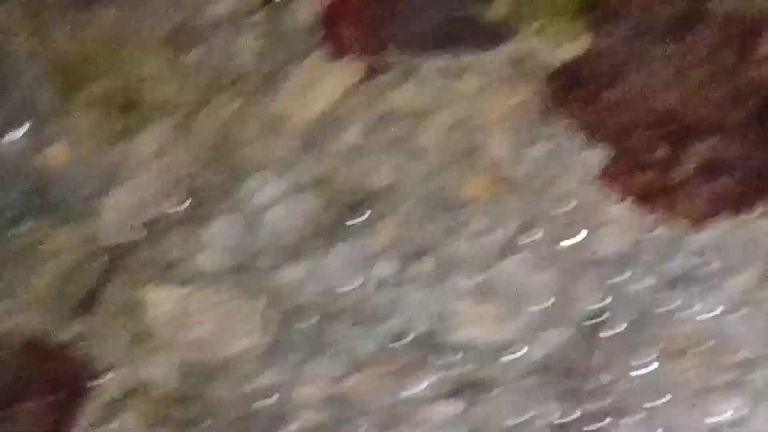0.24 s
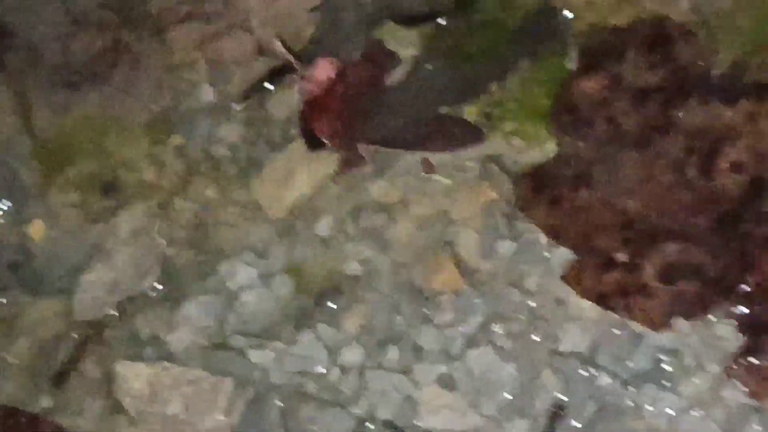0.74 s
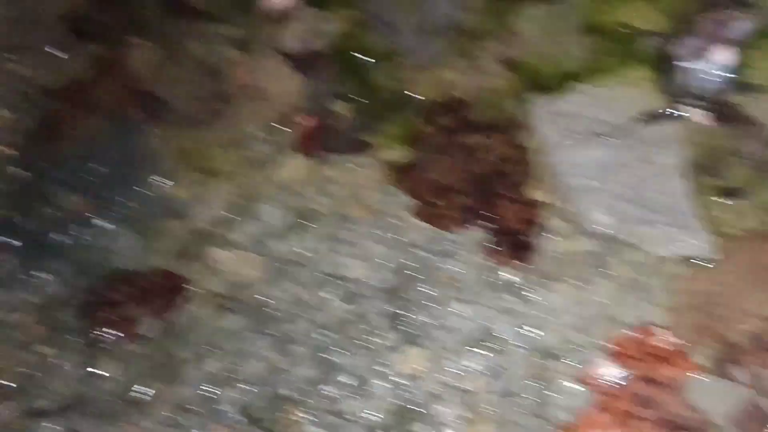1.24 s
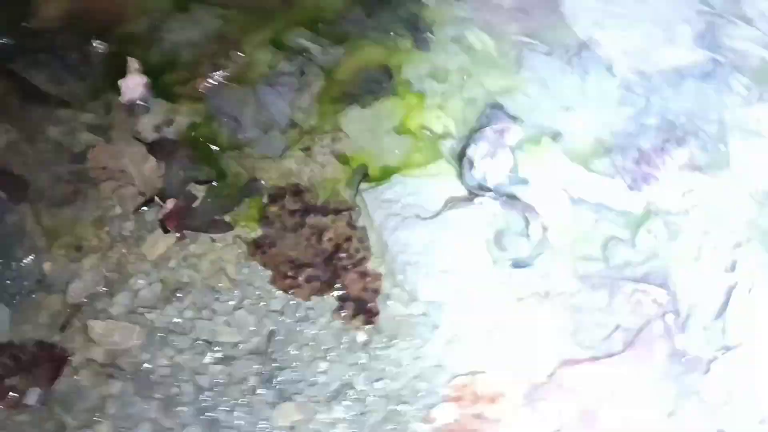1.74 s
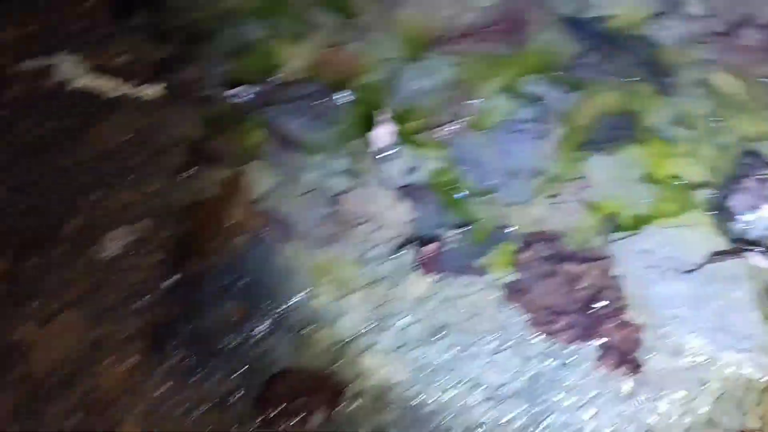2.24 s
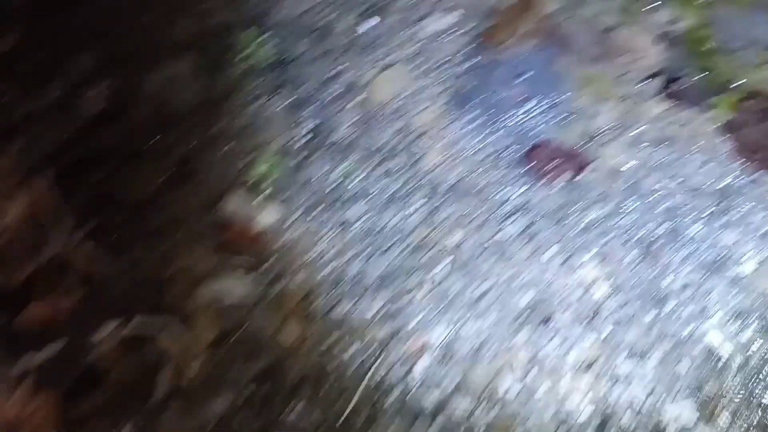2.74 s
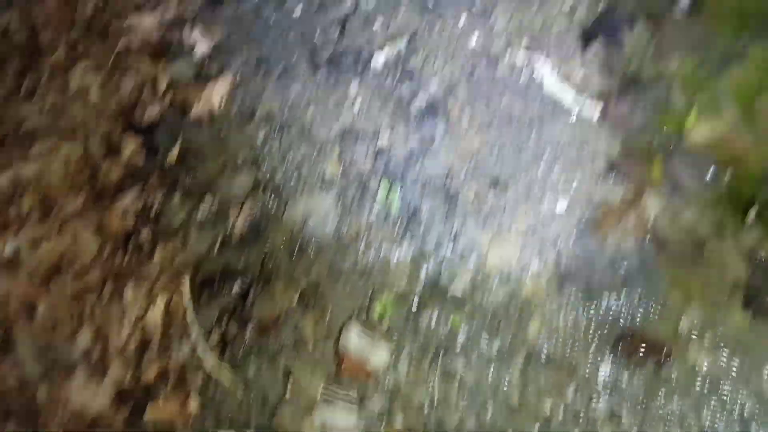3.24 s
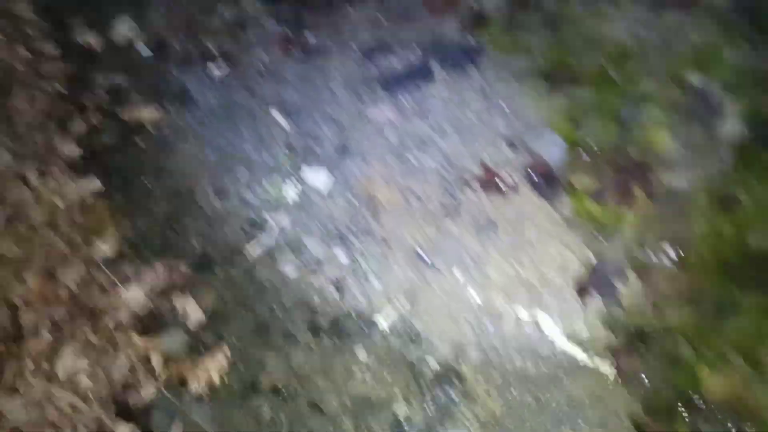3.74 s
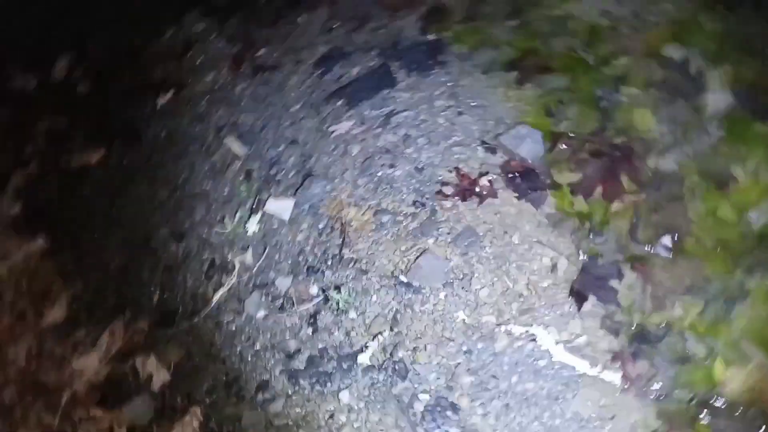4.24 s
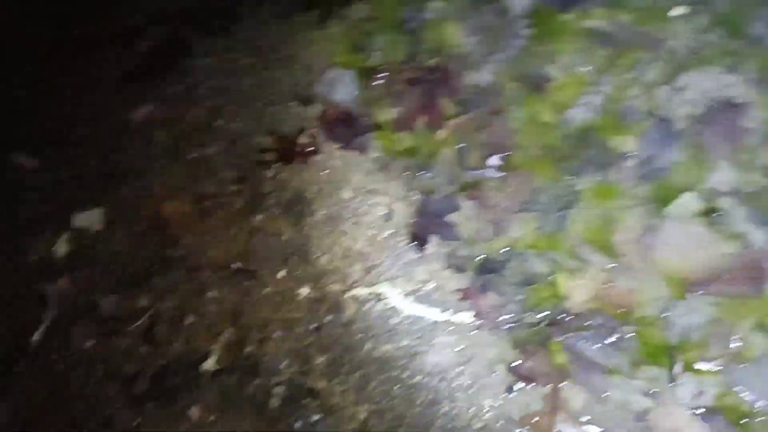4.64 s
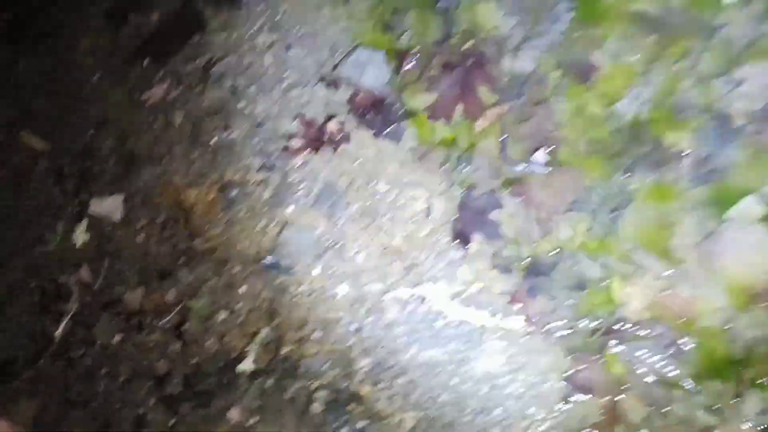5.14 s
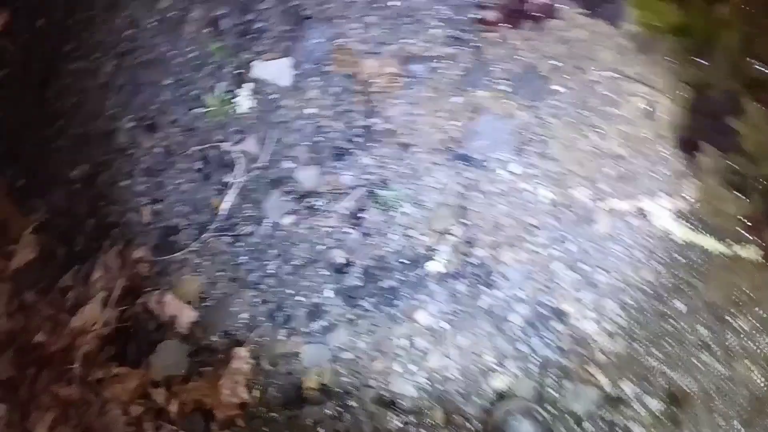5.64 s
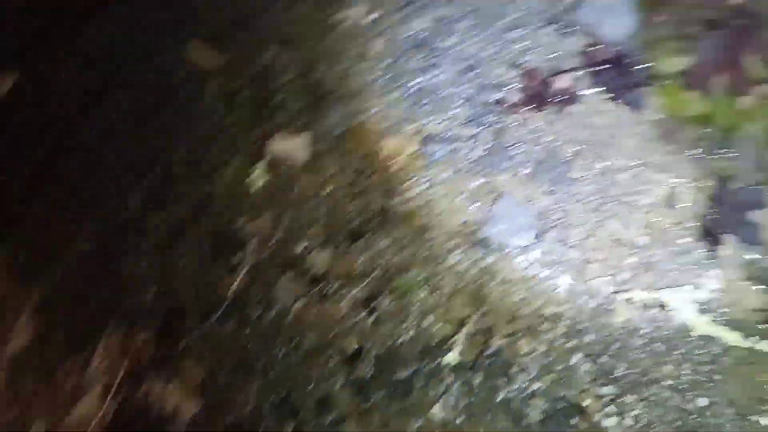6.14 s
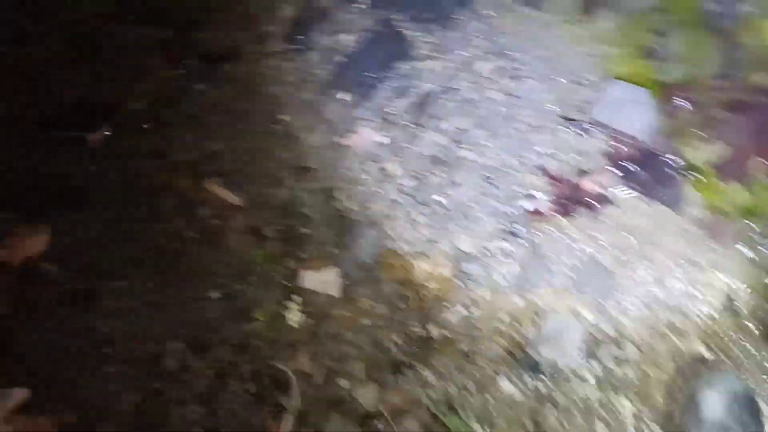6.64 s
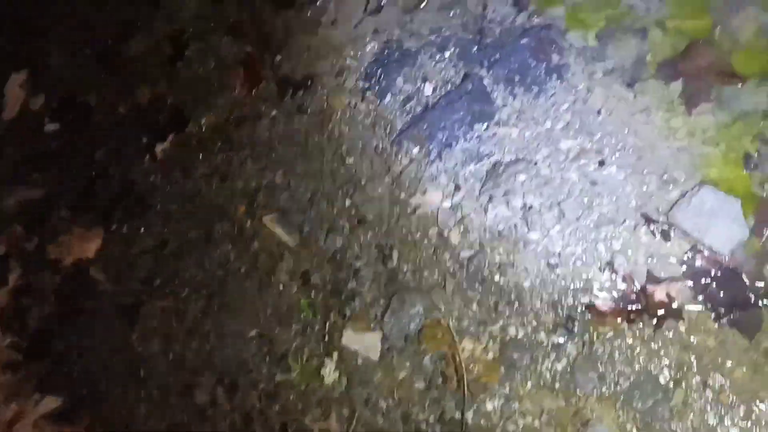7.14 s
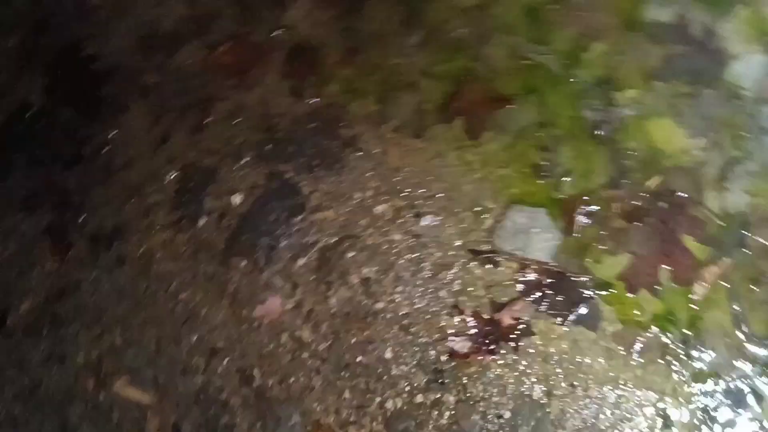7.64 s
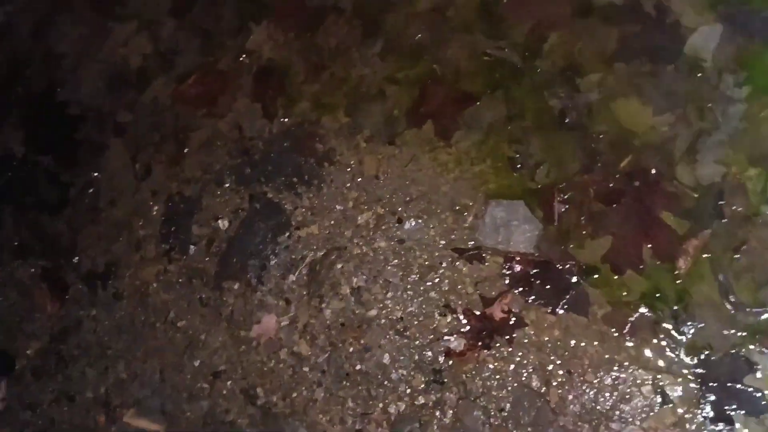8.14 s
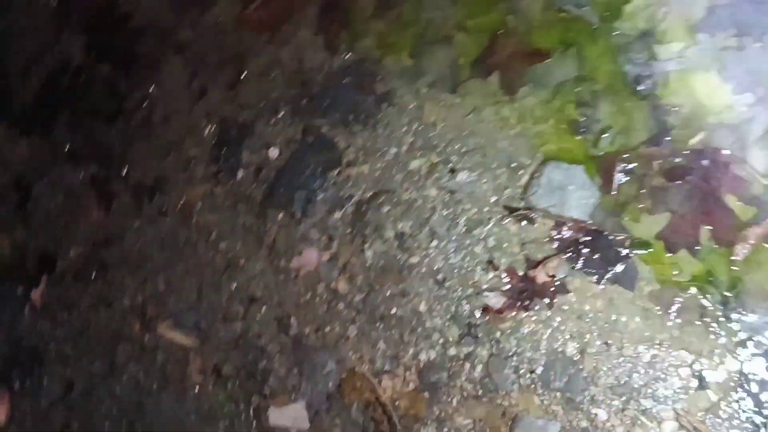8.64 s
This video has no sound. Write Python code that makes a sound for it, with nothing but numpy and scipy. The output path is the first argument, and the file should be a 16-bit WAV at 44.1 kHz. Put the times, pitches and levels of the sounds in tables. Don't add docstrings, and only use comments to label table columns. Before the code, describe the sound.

At night by a wet seep in the woods, many small frogs call close by, short rising rasps overlapping, mostly left, over a faint distant chorus. A handheld stereo microphone picks up bright ticks, dull knocks and brief skin scuffs. Road noise swells on the right after five seconds, strongest around eight, as a larger frog begins a slow trill on the left.

```python
import sys
import numpy as np
from scipy import signal
from scipy.fft import rfft, irfft, next_fast_len
from scipy.io import wavfile
from scipy.ndimage import uniform_filter1d, map_coordinates

SR = 44100
rng = np.random.default_rng(int(sys.argv[2]) if len(sys.argv) > 2 else 0)


def gain_from_db(level_db):
    decades = np.asarray(level_db, float) / 20
    return 10 ** decades


def unload_audio(sound):
    columns = np.transpose(np.atleast_2d(sound))
    steps = np.round(np.clip(columns, -1, 1) * 32767)
    wavfile.write(sys.argv[1], SR, steps.astype(np.int16))


N = 391616
FROG_LAG_MS = 0.65


def in_time(rows, t):
    s, *columns = np.transpose(rows)
    return [np.interp(t, s, c) for c in columns]


def rms_one(x):
    return x / np.sqrt(np.mean(x ** 2) + 1e-20)


def coloured(x, spectrum):
    size = next_fast_len(N)
    hz, level_db = np.transpose(spectrum)
    bins_hz = np.arange(size // 2 + 1) * SR / size
    gain = gain_from_db(np.interp(np.log(bins_hz + 1), np.log(hz), level_db))
    return irfft(rfft(x, size) * gain, size)[..., :N]


def filtered(x, order, hz, kind="low"):
    return signal.sosfilt(signal.butter(order, hz, kind, fs=SR, output="sos"), x)


def drift(rate, size=N):
    knots = rng.standard_normal(int(size / SR * rate) + 3)
    coarse = np.arange(0, size + 16, 16)
    return np.interp(np.arange(size), coarse, map_coordinates(knots, [coarse / SR * rate], order=3))


def add(out, sound, start_s, lag_ms):
    starts = [round((start_s + lag_ms / 1000) * SR), round(start_s * SR)]
    for port, at in enumerate(starts):
        part = sound[port][:max(N - at, 0)]
        out[port, at:at + len(part)] += part


# pitch_hz, level_db
AIR_SPECTRUM = [(30, -17), (75, -1), (125, -13.5), (190, -35), (900, -26.5), (3000, -28.5), (6400, -25.5),
                (8200, -45), (15000, -58.5)]


def air():
    common = rng.standard_normal(N)
    own = 0.8 * rng.standard_normal((2, N))
    both = rms_one(coloured(common + own, AIR_SPECTRUM))
    rumble = filtered(both, 2, 130)
    lumps = gain_from_db(3.5 * drift(15)) - 1
    return (both + rumble * lumps) * gain_from_db(-52.5 + np.array([[2.5], [-5]]))


# time_s, tyre_roar_db
ROAD_NEARNESS = [(0, -66.5), (1.9, -64.5), (2.6, -62.5), (4.5, -58.5), (5.5, -53), (6.1, -55.5), (6.5, -51),
                 (7.2, -49.5), (7.5, -43), (7.95, -43), (8.3, -42.5), (8.5, -46), (8.88, -47)]
# pitch_hz, level_db (per Hz)
ROAR_SPECTRUM = [(50, -21.5), (100, -11.5), (230, -2.5), (400, -5.5), (680, 1), (1100, -1.5), (1310, 0.5),
                 (1550, 3.5), (3000, -11), (6300, -16), (7500, -27.5), (12000, -79)]


def road():
    t = np.arange(N) / SR
    roar_db, = in_time(ROAD_NEARNESS, t)
    swing_db = roar_db + 34.5
    hiss_db = 9.5 * np.exp(-((t - 7.89) / 0.21) ** 4)
    drone_db = 6 * np.exp(-((t - 7.92) / 0.41) ** 4)
    near = 0.5 + 0.5 * np.tanh((t - 7.58) / 0.068)
    direct = rng.standard_normal(N)
    scattered = 0.45 * rng.standard_normal((2, N))
    lag = round(1.399 * SR / 1000)
    both = np.array([np.roll(direct, lag), direct]) + scattered
    wide = rms_one(coloured(both, ROAR_SPECTRUM))

    roar = 0
    edges_hz = [60, 170, 350, 500, 900, 1300, 2000, 3500, 14000]
    for low, high in zip(edges_hz, edges_hz[1:]):
        follows = -0.0032 * (high <= 350) + 0.13 * (low >= 3500) + 0.3 * (500 <= low < 2000)
        band_db = roar_db + 14 + follows * swing_db
        band_db = band_db + hiss_db * (low >= 3500) + drone_db * (low == 500)
        band_db = band_db + near * (5.5 * (low == 1300) - 16 * (low == 900))
        band_db = band_db + 1.1 * drift(8) + 1.5 * drift(60)
        roar = -roar + filtered(wide, 2, [low, high], "band") * gain_from_db(band_db)

    whine_hz, whine_width_hz = 1480, 170
    tread_hz = [whine_hz - whine_width_hz / 2, whine_hz + whine_width_hz / 2]
    whine = rms_one(filtered(both, 2, tread_hz, "band"))
    roar = roar + near * whine * gain_from_db(roar_db - 5 + 1.6 * drift(10))

    pull = 0
    for order in (3, 4):
        turns = np.cumsum(71.0 + 2.5 * drift(25)) / SR
        pull = pull + np.sin(2 * np.pi * order * turns) * gain_from_db(-51.5 + 4.0 * drift(14))
    roar = roar + pull * np.exp(-((t - 6.03) / 0.22) ** 2)

    hum_turns = np.cumsum(70 + 5.0 * drift(12)) / SR
    hum = np.sin(2 * np.pi * hum_turns) * gain_from_db(-39.5 + 0.78 * swing_db + 4.0 * drift(9))
    return (roar + hum) * gain_from_db(np.array([[3.5], [-3.5]]))


def pulses(t, hz, first_s, per_s, overtones, rise_ms, uneven_db):
    chance = rng.standard_normal((7, 64))
    jitter = 0.03 * np.interp((t - t[0]) * 30, np.arange(64), chance[5])
    count = (t - first_s) * per_s + 0.3 + jitter
    since_ms = count % 1 / per_s * 1000
    index = (np.floor(count) - np.floor(count).min()).astype(int)
    turns = np.cumsum(hz * (1 + 0.007 * chance[6, index]) / 2 / SR)
    turns = turns - turns[np.searchsorted(np.maximum.accumulate(index), index)]
    close = np.sin(np.pi / 2 * np.minimum((1 - count % 1) * 6.0, 1)) ** 2
    tone = 0
    for (multiple, level_db, decay_ms), luck in zip(overtones, chance):
        gain = gain_from_db(level_db + uneven_db * luck[index])
        rise = np.sin(np.pi / 2 * np.minimum(since_ms / min(rise_ms, decay_ms), 1)) ** 2
        decay = np.exp(-(since_ms / decay_ms) ** (1 + (multiple == 2)))
        tone += gain * rise * decay * np.sin(2 * np.pi * round(multiple) * turns)
    flow = rise * np.exp(-since_ms / 4.0)
    return rms_one(tone * close), rms_one(flow * close)


def call(out, first_s, length_s, end_hz, end_db, pulse_hz, bright_db, steepness, pan_db, lag_ms,
         spray, overtones, spray_db=0, swell=1):
    lead_in_s, climb_hz_per_s, climb_eases_s = 0.0042, 1596, 0.41
    start, end = max(first_s - lead_in_s, 0), first_s + length_s + 0.0062
    t = np.arange(start, end, 1 / SR)
    climb_s = climb_eases_s * (1 - np.exp((t - end) / climb_eases_s))
    hz = end_hz - steepness * climb_hz_per_s * climb_s
    hz = hz * (1 + 0.1 * np.exp((t - end) / 0.019))
    surge_db = 4.5 * np.exp(-((end - t) / 0.034) ** 2)
    level_db = end_db + swell * 35 * (t - end) + surge_db
    attack = (t - first_s + lead_in_s) / (0.11 * length_s)
    release = (end - t) / 0.025
    edges = np.clip(np.minimum(attack, release), 0, 1)

    bright_db = bright_db + 9.5 * (t - end)
    overtones = [(k, db + bright_db * (k != 2), ms) for k, db, ms in overtones]
    tone, flow = pulses(t, hz, first_s, pulse_hz, overtones, rise_ms=2.6, uneven_db=2.0)
    spray_gain = gain_from_db(bright_db + spray_db + 22 * (t - end))
    rasp = edges * (tone + spray_gain * flow * spray[(t * SR).astype(int) % len(spray)])
    bounces = (rng.uniform(0.001, 0.006, 2) * SR).astype(int)
    rasp = np.array([rasp + 0.2 * np.roll(rasp, lag) for lag in bounces])
    pan = gain_from_db(np.array([[pan_db / 2], [-pan_db / 2]]))
    add(out, rasp * gain_from_db(level_db) * pan, start, lag_ms)


# multiple, level_db, decay_ms (within a pulse)
OVERTONES = [(1, -14, 2.2), (2, 0, 6.8), (3, -8, 1.7), (4, -17, 1.6), (5, -20, 1.6)]
# pitch_hz, level_db (per Hz)
SPRAY_SPECTRUM = [(500, -22.5), (1000, -3), (3300, -3), (4500, -9), (6500, 0), (7400, -16), (9700, -20),
                  (10700, -3), (11500, -33.5)]
# first_pulse_s, length_s, final_pitch_hz, final_level_db
AHEAD_CALLS = [(0.3426, 0.39, 2490, -21), (0.47, 0.44, 2460, -38), (0.6609, 0.083, 2600, -26),
               (1.0953, 0.089, 2550, -25.5), (1.4738, 0.071, 2820, -22.5), (1.7412, 0.11, 1936, -29.5),
               (3.2945, 0.3, 2233, -33.5), (3.737, 0.194, 2463, -36.5), (5.0883, 0.313, 2385, -24.5),
               (5.9317, 0.085, 2400, -28.5), (6.1958, 0.3446, 2398, -22.5), (6.6869, 0.31, 2550, -28.5),
               (7.4397, 0.322, 2322, -21), (7.5613, 0.24, 2603, -22.5), (8.5125, 0.28, 2570, -29),
               (8.5506, 0.23, 2304, -28)]
MIDDLE_CALLS = [(-0.0661, 0.35, 2330, -21.5), (0.0493, 0.24, 2562, -21.5), (0.2276, 0.072, 2196, -26),
                (0.6922, 0.34, 2332, -23.5), (0.7816, 0.38, 2414, -22.5), (1.3244, 0.22, 2550, -28.5),
                (1.5918, 0.26, 2207, -24), (2.4598, 0.067, 2700, -21.5), (2.6088, 0.32, 2607, -30.5),
                (2.662, 0.14, 2382, -26), (4.7655, 0.183, 2500, -30), (4.9538, 0.085, 2533, -24),
                (5.0194, 0.067, 2290, -23.5), (5.7923, 0.088, 2550, -19.5), (6.2985, 0.21, 2420, -26),
                (6.4372, 0.059, 2463, -23), (6.873, 0.056, 2525, -22), (8.1272, 0.22, 2527, -31)]
LEFT_CALLS = [(0.2113, 0.043, 2740, -37), (0.7995, 0.25, 2142, -18.5), (1.46, 0.086, 2454, -26),
              (1.562, 0.37, 2460, -19), (1.7117, 0.071, 2504, -25.5), (2.2199, 0.3226, 2480, -27.5),
              (2.3, 0.11, 2410, -23), (2.7188, 0.076, 2337, -25.5), (3.1988, 0.28, 2572, -19),
              (3.438, 0.21, 2570, -28), (4.1157, 0.345, 2406, -23), (7.1587, 0.067, 2350, -23.5),
              (7.2322, 0.13, 2500, -22), (7.2948, 0.077, 2210, -24.5), (8.1315, 0.23, 2392, -22),
              (8.3006, 0.3, 2370, -27.5)]
BACK_CALLS = [(1.9774, 0.079, 2480, -33), (2.0704, 0.07, 2470, -33), (2.9569, 0.078, 2660, -35.5),
              (3.1589, 0.039, 2310, -36.5), (3.7296, 0.18, 2516, -31), (3.857, 0.16, 2550, -32),
              (4.4812, 0.14, 2310, -30), (4.6256, 0.1, 2600, -34), (4.85, 0.08, 2330, -32),
              (5.1077, 0.12, 2534, -30), (5.371, 0.1, 2760, -37), (5.529, 0.1, 2310, -38.5),
              (5.6698, 0.057, 2614, -32), (5.4, 0.039, 2155, -28.5), (6.0382, 0.081, 2460, -33),
              (7.7548, 0.18, 2730, -34), (.6, 0.1, 3040, -36.5), (.795, 0.072, 2510, -30),
              (1.95, 0.13, 1680, -41), (2.24, 0.23, 1665, -44.5), (3.03, 0.18, 3100, -46),
              (5.5, 0.11, 2910, -44), (5.7274, 0.065, 2360, -38)]
AHEAD_PULSING = [79.0, 80.0, 82.75, 66.75, 78.75, 76.0, 68.0, 76.75, 66.75, 82.5, 74.5, 80.75, 67.25, 77.5,
                 75.0, 68.75]
MIDDLE_PULSING = [78.0, 75.0, 71.5, 73.25, 69.75, 73.75, 74.0, 74.0, 64.0, 70.75, 74.75, 79.0, 81.0, 77.0,
                  65.75, 70.75, 82.0, 71.5]
LEFT_PULSING = [78.5, 71.5, 74.25, 76.5, 74.75, 74.5, 74.0, 67.5, 75.5, 79.0, 68.5, 73.75, 77.0, 73.25,
                77.25, 75.75]
BACK_PULSING = [68.75, 76.75, 72.75, 77.75, 83.25, 78.5, 80, 78, 73.75, 69, 69.25, 85, 76, 83.5, 78.5,
                77.25, 78, 76, 70, 70, 80, 80, 77]
# overtones_and_spray_db, climb_steepness (share)
AHEAD_VOICES = [(0.5, 0.96), (-4, 0.89), (-7, 0.52), (-1, 1), (-2.5, 1), (13, 0.97), (6.5, 0.65),
                (11, 0.82), (6.5, 1), (-9.5, 1), (-4, 1), (-7, .9), (-15, 0.84), (5.5, 0.93), (-8, 0.41),
                (-6, 0.84)]
MIDDLE_VOICES = [(2.5, 0.76), (0, 0.74), (-11, 1), (4, 0.87), (5.5, 1), (9.5, 1), (7, 0.99), (2.5, 0.89),
                 (6.5, 0.62), (4, 0.66), (-2, 0.29), (-2.5, 0.77), (-3.5, 0.35), (-5, 0.54), (6.5, 0.55),
                 (-0.5, 0.5), (-2, 0.69), (-9, 0.69)]
LEFT_VOICES = [(-8, .9), (-5.5, 0.38), (-4.5, 1.4), (-2, 0.97), (4.5, 1.2), (9, 0.92), (-1.5, 0.64),
               (-1.5, 0.38), (6, 1.2), (6.5, 1.04), (4.8, 1.27), (-6.5, 0.88), (-7, 0.97), (3.5, 1.1),
               (-4.5, 0.72), (-10, 0.66)]
BACK_VOICES = [(-1, 0.42), (-5, 0.7), (-6.5, 0.74), (-5, 0.79), (8.5, 1.46), (7, 1.7), (5.5, 1.3),
               (11, 1.1), (2.5, 0.63), (-19, 1.4), (-16.5, 0.74), (0.5, 0.99), (-1.5, 1), (3, 1.3),
               (-6, 0.63), (7, 0.66), (-9, 0.99), (0.5, .8), (-8, 1.8), (-14, 0.18), (-3, .7), (-7, 0.49),
               (-9, 0.65)]
# spray_db, fourth_overtone_db, left_over_right_db (off the group's)
AHEAD_TRAITS = [(1, -4, -0.5), (-11, -3, 3), (6, -5, 7), (-2, 0, -3.5), (-9, -4, 2.5), (-8, 3, 3.5),
                (8.5, 2, 5), (-7, -5, 6.5), (0.5, -6, 4), (5.5, -4, -2), (-2, -4, 1), (2, -5, 3.5),
                (0, -7, -1), (-3, 8, -0.5), (6, 2, -7), (7.5, -1, 3.5)]
MIDDLE_TRAITS = [(4.5, 4, 0), (6.5, 14, 0.0069), (-9, -8, 0), (0, 3, 0), (-9, 5.5, 0.0067), (-7, 7, 0),
                 (-2.5, -15, 0.021), (-8.5, -13, 0), (-2.5, -3, 0), (4, 0, 0), (1.5, 5, 0),
                 (-9, -3, 0.0044), (-7, 0, 0), (-3, -4, 0.0034), (0.5, -6, 0), (-1, 5, 0), (-1, -7, 0),
                 (-5, -5, 0.011)]
LEFT_TRAITS = [(-4, -6, 0.0041), (2.5, -8, 0), (-1, -3, 0), (0.5, 3, 0.0028), (-0.5, -5, 0), (-13, 2, 0),
               (-20, -2, 0), (2, -5, 0), (-7.5, -8, 0), (-3, 2, 0), (-2, -12, 0.0084), (5, -2, 0),
               (6.5, -3, 0), (1.5, -1, 0), (-5, 0, 0.0074), (1.5, 1, 0.011)]
BACK_TRAITS = [(-1.5, 5, 0), (1.5, 5, 0), (8, -3, 0.0066), (5, -5, 0), (-10, 4, 0), (-25, -12, 0),
               (1, -6, 0), (-5.5, 3, 0), (-8, 1, 0.0048), (-3, -3, 0.0061), (6, -3, 0), (9.5, -12, 0),
               (1, -1, 0.0072), (0.5, -12, 0), (8, -4, 0.0034), (7, 3, 0.012), (-2, -4, 0), (1, 1, 0),
               (3, -9, 0.0042), (-3, -6, 0), (7, -4, 0.0053), (1, -3, 0), (0, -3, 0.0037)]
AHEAD_SWELLS = [0.86, .9, .9, 0.82, .9, .9, 0.38, 1, 1, .9, 0.98, 1, 0.86, 0.53, 0.95, 0.7]
MIDDLE_SWELLS = [0.44, 0.84, .9, 0.96, 0.96, 0.81, 0.72, .9, 0.34, 0.78, 1.1, 0.81, .9, 3.3, .9, .9, .9, .9]
LEFT_SWELLS = [.9, 0.96, 0.99, 0.75, .9, 1.36, 0.81, .9, 1.2, 1.1, 1.2, .9, 1.3, .9, 1.8, 1.3]
# first_pulse_s, length_s, final_pitch_hz, final_level_db, overtones_db
FILL_CALLS = [
    (1.975, 0.093, 716, -53, -14),
    (1.9, 0.097, 2200, -33, 7),
    (6.5, 0.06, 2500, -38.5, -15),
    (5.7, 0.061, 2500, -29, -2),
    (7.07, .1, 2230, -36.5, -10),
    (8.7, 0.086, 2600, -36, -8),
    (7.7, 0.058, 2400, -30.5, 0.5),
    (0.048, .12, 2600, -25.5, 2),
]


def near_frogs():
    out = np.zeros((2, N))
    spray = gain_from_db(-15.5) * rms_one(coloured(rng.standard_normal(N), SPRAY_SPECTRUM))
    back_swells = np.ones(len(BACK_CALLS))
    # left over right, dB
    groups = [(AHEAD_CALLS, AHEAD_PULSING, AHEAD_VOICES, AHEAD_TRAITS, AHEAD_SWELLS, 3.5),
              (MIDDLE_CALLS, MIDDLE_PULSING, MIDDLE_VOICES, MIDDLE_TRAITS, MIDDLE_SWELLS, 7.5),
              (LEFT_CALLS, LEFT_PULSING, LEFT_VOICES, LEFT_TRAITS, LEFT_SWELLS, 10),
              (BACK_CALLS, BACK_PULSING, BACK_VOICES, BACK_TRAITS, back_swells, 7)]
    for calls, pulsing, voices, traits, swells, pan_db in groups:
        lags = FROG_LAG_MS + 0.14 * rng.standard_normal(len(calls))
        callers = zip(calls, pulsing, voices, traits, swells, lags)
        for row, pulse_hz, voice, (spray_db, fourth_db, off_db), swell, lag_ms in callers:
            overtones = [(k, db + fourth_db * (k == 4), ms) for k, db, ms in OVERTONES]
            call(out, *row, pulse_hz, *voice, pan_db + off_db, lag_ms, spray, overtones, spray_db, swell)
    for *row, bright_db in FILL_CALLS:
        call(out, *row, 76.0, bright_db, 0.87, 15.0, FROG_LAG_MS, spray, OVERTONES)
    return out


def far_frogs():
    out = np.zeros((2, N))
    for place, size, near, side in rng.random((99, 4)):
        call(out, place * N / SR, 0.2734, 2200 + 550 * size, -48 + 4.6 * near,
             pulse_hz=68 + 12 * size, bright_db=-4.0, steepness=0.71, pan_db=4.2,
             lag_ms=1.598 * side, spray=np.zeros(1), overtones=OVERTONES[:3])
    return filtered(out, 2, 4000)


def woods(x):
    t = np.arange(SR // 3) / SR
    t60_s = 0.22
    scatter = rng.standard_normal((2, len(t))) * gain_from_db(-60 * t / t60_s) * np.minimum(t / 0.0034, 1)
    scatter /= np.sqrt(np.sum(scatter ** 2, axis=1, keepdims=True))
    scatter = filtered(scatter, 2, 3700)
    return gain_from_db(-5) * signal.fftconvolve(x, scatter, axes=1)[:, :N]


# start_s, peak_db, left_over_right_db
TICKS = [(0.499, -15.5, 10), (0.538, -12.5, 21), (0.592, -19.5, 19), (0.6079, -8, 25), (0.715, -17, 28),
         (0.751, -22, 32), (1.2986, -30, -3), (1.6983, -17.5, 31), (1.861, -15, 32), (1.913, -25, 23),
         (2.4547, -55, 16), (2.583, -12, 45), (2.7922, -24, -2), (2.813, -3.5, 16), (3.806, -16.5, 29),
         (3.968, -53, 10), (0.372, -27, 27), (2.567, -32, 6), (2.935, -24, 22), (4.2822, -22, 23),
         (4.3012, -8.5, 2), (4.391, -25, 13), (4.411, -15, 1), (4.539, -20, 6), (4.558, -8, 18),
         (4.592, -10, -2.5), (4.5932, -29, -5), (5.182, -14.5, 10), (5.341, -26, 14), (5.853, -25, 22),
         (7.1828, -6, 23), (7.34, -15, 16)]


def ticks():
    out, t = np.zeros((2, N)), np.arange(SR // 30) / SR
    fade = np.exp(-t / 0.00095) + 0.13 * np.exp(-t / 0.016)
    envelope = fade * np.minimum(t / 0.00033, 1)
    for s, peak_db, pan_db in TICKS:
        snap = rng.standard_normal(len(t)) * envelope
        sides_db = np.array([[min(pan_db, 0)], [-max(pan_db, 0)]])
        add(out, snap * gain_from_db(peak_db + 4.0 + sides_db), s + 0.0013, 0.3)
    port = [(250, -31.0), (600, 0.5), (2000, -7.0), (6300, 3.5), (8500, -20), (15000, -59.5)]   # Hz, dB
    return coloured(out, port)


# start_s, peak_db,
# ring_hz, left_over_right_db, ring_decay_ms
KNOCKS = [(0.499, -7.5, 370, -13, 3.7), (0.5151, -25.5, 370, -12, 4), (1.084, -29, 600, -10, 1.8),
          (1.097, -30, 252, -15, 3.7), (1.3045, -21.5, 810, -15, 1.6), (0.547, -28.5, 298, -3, 1.9),
          (0.601, -36, 774, -26, 1.4), (0.71, -25.5, 323, -43, 2.2), (0.959, -12.5, 336, -14, 1),
          (1.07, -9.5, 436, -11.5, 2.05), (1.129, -17.5, 950, 54, 0.93), (1.298, -10, 433, -18, 1.9),
          (1.856, -21.5, 790, 61, 1.24), (2.759, -26, 720, 50, 1.9), (2.808, -13.5, 1980, 10, 2.3),
          (3.369, -28.5, 513, 10, 2.8), (4.298, -14, 1140, 16, 0.87), (4.409, -12, 940, 23, 0.88),
          (4.54, -7, 270, -12.5, 1.36), (5.305, -20, 660, 32, 1.3), (6.605, -35, 740, 13, 13),
          (6.69, -35.5, 754, 10, 12), (3.901, -41.5, 257, 17, 7.2)]


def knocks():
    out, t = np.zeros((2, N)), np.arange(SR // 25) / SR
    for s, peak_db, hz, pan_db, decay_ms in KNOCKS:
        body = np.cos(2 * np.pi * hz * t) * np.exp(-1000 * t / decay_ms) * np.minimum(t / 0.00012, 1)
        body += 0.04 * uniform_filter1d(rng.standard_normal(len(t)), size=4) * np.exp(-t / 0.011)
        bounce = uniform_filter1d(np.roll(body, round(0.00597 * SR)), size=24)
        body += 0.23 * bounce
        sides_db = np.array([[min(pan_db, 0)], [-max(pan_db, 0)]])
        add(out, body * gain_from_db(peak_db + 11 + sides_db), s + 0.0029, 1.137)
    return out


# start_s, length_s,
# level_db, upper_edge_hz, left_over_right_db
SCUFFS = [(0.535, 0.083, -42.5, 7800, -2), (2.736, 0.15, -39.5, 7400, 2), (3.325, 0.19, -61, 7000, 3),
          (3.668, 0.15, -45.5, 6560, 23), (4.531, 0.079, -36, 6000, -15), (4.536, 0.012, -35, 16000, -14),
          (4.554, 0.0092, -36, 16000, -8), (4.59, 0.011, -31, 16000, -13), (5.25, 0.098, -52, 7200, 16),
          (5.509, 0.035, -54, 12500, 12), (7.307, 0.064, -37.5, 6560, 15)]


def scuffs():
    out = np.zeros((2, N))
    for s, length_s, level_db, hz, pan_db in SCUFFS:
        size = round(length_s * SR)
        grain = rng.standard_normal((2, SR // 4)) * gain_from_db(5 * drift(500, size=SR // 4))
        grain = grain[:, :size] * np.hanning(size) ** 0.5
        hiss = filtered(grain, 2, [hz * 0.087, min(hz, 0.45 * SR)], "band")
        add(out, hiss * gain_from_db(level_db + np.array([[pan_db / 2], [-pan_db / 2]])), s, 0)
    return out


# time_s, pitch_hz, level_db, left_over_right_db
TRILL = [
    (7.86, 1400, -54, 9),
    (8.02, 1442, -35, 10),
    (8.35, 1476, -49, 5),
    (8.55, 1440, -39, 17),
    (8.7, 1500, -35, 22.5),
    (8.88, 1510, -36, 19.5),
]


def trill():
    out, t = np.zeros((2, N)), np.arange(TRILL[0][0], N / SR, 1 / SR)
    hz, level_db, pan_db = in_time(TRILL, t)
    per_s = 31.8 - (t - 7.88)
    tone, _ = pulses(t, hz, 7.882, per_s, [(2, 0, 13.0)], rise_ms=7.0, uneven_db=1.5)
    sides_db = np.array([level_db + pan_db / 2, level_db - pan_db / 2])
    add(out, tone * gain_from_db(sides_db), t[0], FROG_LAG_MS)
    return out


# pitch_hz, level_db
RIGHT_PORT = [(300, 2), (2400, 0), (4400, -5), (7000, -10), (15000, -4)]


def scene():
    frogs = near_frogs() + trill()
    far = far_frogs()
    frogs = coloured(frogs, [(7000, 0), (9000, -18)])
    outside = frogs + woods(frogs) + road() + gain_from_db(1.5) * far + gain_from_db(8.5) * woods(far)
    outside[1] = coloured(outside[1], RIGHT_PORT)
    return outside + air() + ticks() + knocks() + scuffs()


def top_cut(x):
    return signal.sosfilt(signal.butter(12, 16530, fs=SR, output="sos"), x)


def record(dry):
    overloaded = dry / (1 + (dry / 0.9) ** 6) ** (1 / 6)
    mix = signal.sosfilt(signal.cheby2(10, 60, 16500, fs=SR, output="sos"), overloaded)
    return top_cut(mix)


dry = scene()
out = record(dry)
unload_audio(out)
```